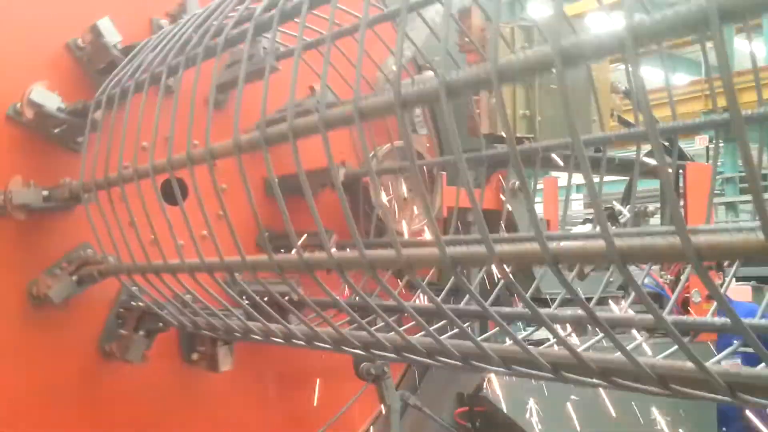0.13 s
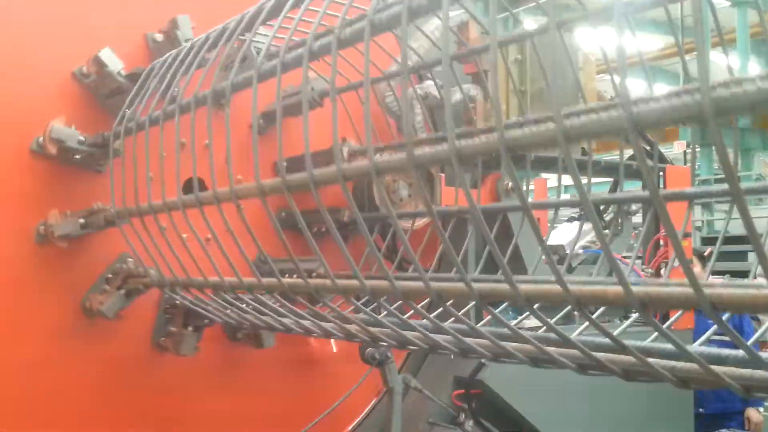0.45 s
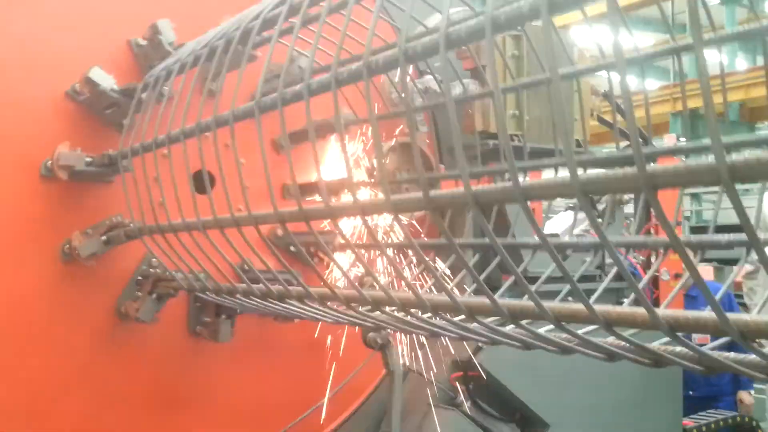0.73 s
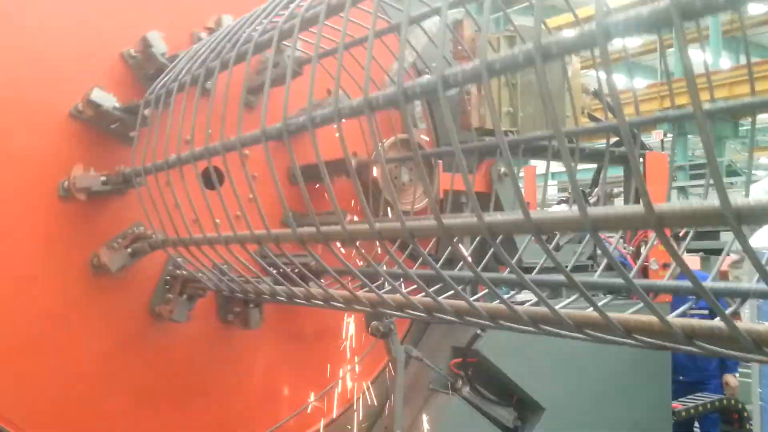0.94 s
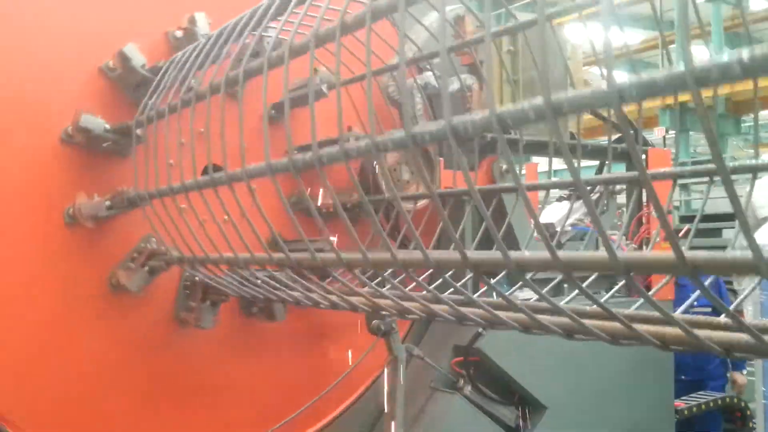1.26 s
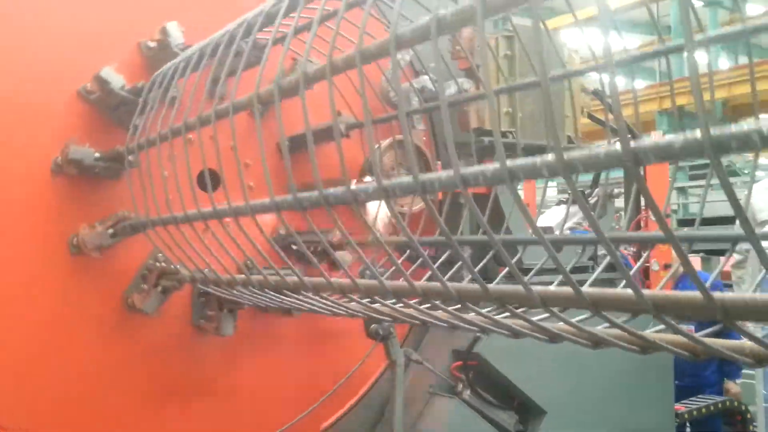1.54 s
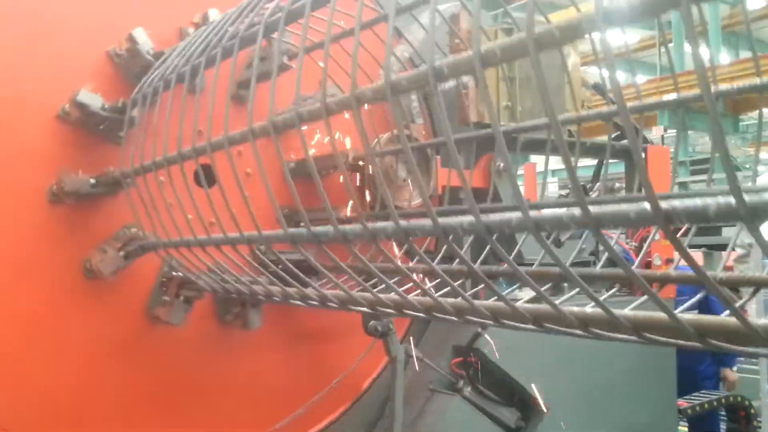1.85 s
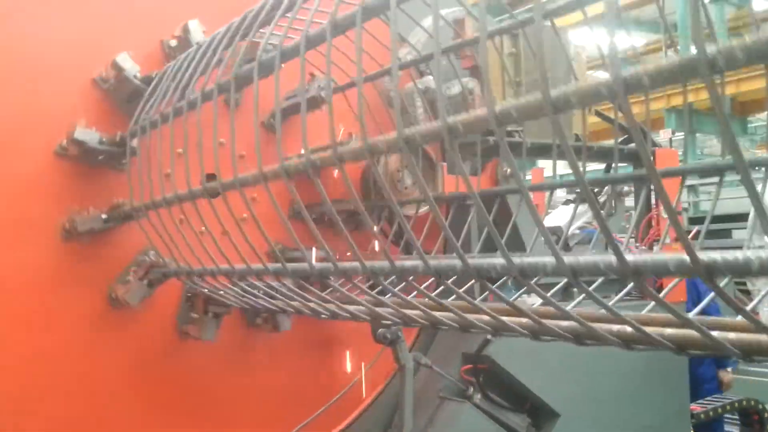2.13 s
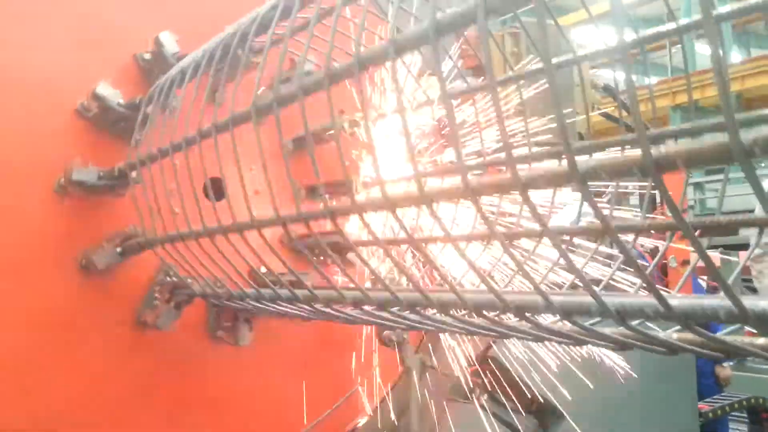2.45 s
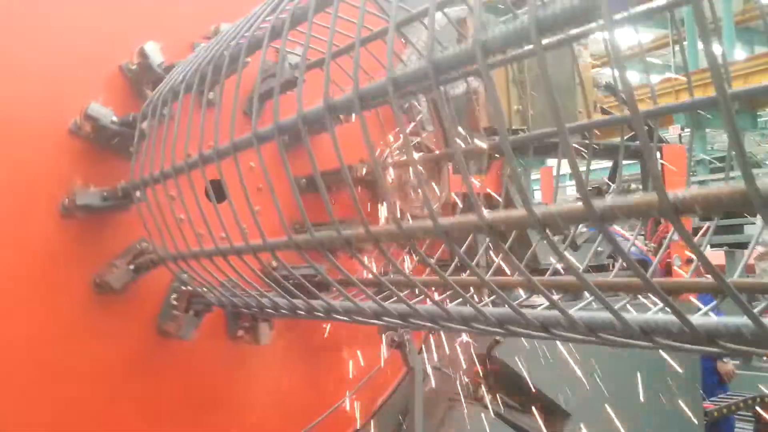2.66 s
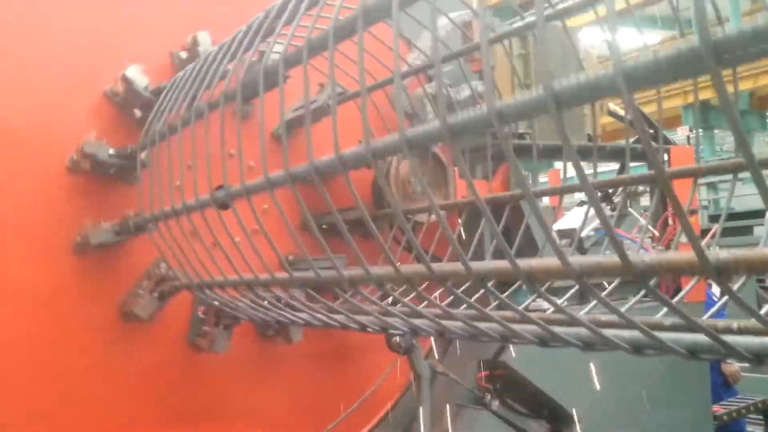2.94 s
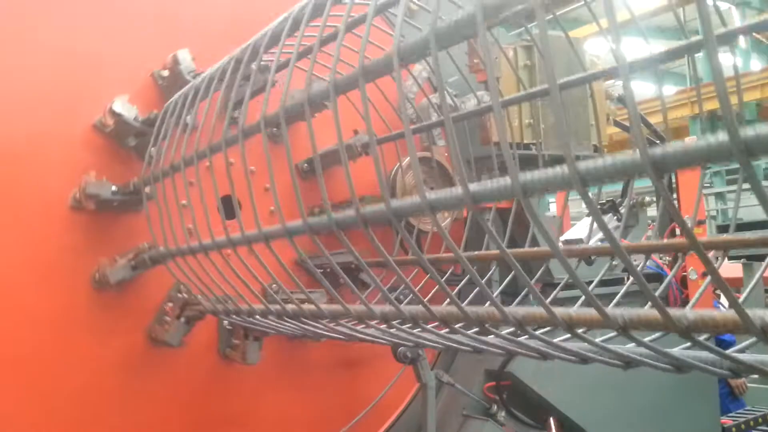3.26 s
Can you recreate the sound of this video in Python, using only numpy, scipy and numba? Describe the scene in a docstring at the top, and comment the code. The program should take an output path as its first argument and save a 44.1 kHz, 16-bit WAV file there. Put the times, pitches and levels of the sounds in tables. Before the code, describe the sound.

Welding machine fires irregular, bright sputtering bursts that ring a steel bar cage and wash through a large factory hall, over constant motor and fan roar, wavering hum and occasional dull knocks; loud, clipped stereo camera sound.

```python
"""Bright weld sputter bursts ring a steel cage and fill a factory hall, over a roar and wavering hum.
Sputter: clicks and hiss under burst envelopes, through cage resonances and diffuse hall tails.
Dull knocks of the drive are decaying noise bands; motor lines are steady tones plus narrow noise.
Motors and fans roar as random short-time spectra with drifting patches.
A camera with two spaced microphones evens the level by gain control and clips the peaks."""
import sys
import numpy as np
from scipy import signal
from scipy.fft import rfft, irfft, next_fast_len
from scipy.io import wavfile
from scipy.ndimage import uniform_filter1d
from numba import njit

SR = 44100
rng = np.random.default_rng(int(sys.argv[2]) if len(sys.argv) > 2 else 0)


def elevation(decibels):
    """Turn decibel levels (scalar or array-like) into linear amplitude ratios."""
    levels = np.asarray(decibels, float)
    return 10 ** (levels / 20)


def wrap_up_sound(samples):
    """Save the sound to the file named by the first command line argument, as 16-bit audio."""
    columns = np.atleast_2d(samples).T
    # keep every value between -1 and 1, then stretch to whole-number steps
    tamed = np.clip(columns, -1, 1)
    steps = np.round(tamed * 32767).astype(np.int16)
    wavfile.write(sys.argv[1], SR, steps)


N = 149499

# weld bursts: start_s, relative treble_db, mid_minus_treble_db, relative top_minus_treble_db, length_s
BURSTS = [(-.03, -4.5, 6.5, 0, 0.023), (.01, -8, -5.5, 2, 0.029), (0.036, -12.5, -4, 6, 0.029),
          (0.085, -11.5, 0, 0, 0.038), (0.146, -15, 3.5, 2, 0.035), (0.19, -7, -1, -7, 0.043),
          (0.29, -9.5, -1.5, -3.5, .033), (0.347, -10.5, -2.5, -1, 0.048), (0.479, -11, 0, -7, 0.042),
          (0.591, -13, 0.5, 1, 0.036), (0.637, -14, 1.5, 1, 0.03), (0.695, -11, -1.5, -3, 0.026),
          (0.73, -6.5, -2, -2, 0.013), (0.968, -14.5, -1, -1, 0.052), (1.049, -16, 3.5, -4, 0.034),
          (1.121, -8.5, 0.5, -4.5, 0.033), (1.417, -12, 3.5, 1, 0.012), (1.433, -23, 12.5, -8, 0.03),
          (1.51, -28, -5, 11, 0.014), (1.555, -8, 0.5, -1, .022), (1.571, -7, -5, -5, 0.021),
          (1.677, -21, 1, 0, 0.0086), (1.865, -16.5, -8, 5.5, .03), (1.906, -8.5, -1.5, -1, 0.022),
          (1.957, -13, -14, 3, 0.056), (2.017, -5, -3, 0.5, 0.034), (2.203, -11, 0, -2.5, 0.015),
          (2.235, -22.5, 8, 4, 0.057), (2.33, -17, 3, -3, 0.012), (2.426, -4, -2.5, -2.5, 0.033),
          (2.51, -13, 0, -3, 0.0083), (2.59, -25, 1, 13, 0.014), (2.728, -20, 11.5, -13, 0.024),
          (2.869, -5.5, -1, -11, 0.029), (2.927, -7.5, -7, -4, 0.036), (2.964, -8.5, -4, -3.5, .03),
          (3.046, -9.5, 0, 2.5, 0.026), (3.279, -14, 1.5, 7, 0.033), (3.299, -7, 0.5, -34, 0.026),
          (3.349, -6.5, -1.5, 2.5, 0.045)]
# sputter treble spectrum: freq_hz, relative level_db per Hz
TREBLE_SPECTRUM = [(2060, -33), (3500, 0.5), (4200, 3), (4690, 2.5), (5070, -3), (5600, -1), (5900, -5),
                   (6600, -4), (7510, -5.5), (9000, -11.5), (11000, -18), (14000, -53)]
# sputter mid spectrum: freq_hz, relative level_db per Hz
MID_SPECTRUM = [(410, -24.5), (700, -10), (912, -8.5), (1600, 5), (2400, -1.5), (3050, 0), (3400, -9),
                (4500, -18), (5850, -83), (9900, -120)]
# sputter top spectrum: freq_hz, relative level_db per Hz
TOP_SPECTRUM = [(6000, -30), (8000, -9.5), (9200, 3), (9900, -4), (11000, 1.5), (12500, -1.5), (13500, -4),
                (14600, -7.5)]
# cage modes: freq_hz
CAGE_MODE_HZ = [2115, 2347, 2660, 2790, 5030, 5095, 5190, 5336, 7010, 9900]
# the same cage modes: width_hz, peak_db over the unresonant path
CAGE_MODES = [(44.6, -3.5), (35, 6), (45, -5), (59.7, 0.5), (25, 10), (40, -2), (60, -6), (20, -2.5),
              (100, -1), (150, 1)]
# weld balance: freq_hz, left_minus_right_db
WELD_BALANCE = [(900, -1.5), (1250, 1), (2280, 3), (4190, 0), (5200, -4.5), (7690, 0.5), (14100, 6.5)]
# hall decay: freq_hz, t60_s
HALL_DECAY = [(500, 0.5), (2000, 1.52), (5000, 0.73), (9000, 0.83), (14000, 0.88)]
# drive knocks: start_s, level_db, pitch_hz, left_minus_right_db
KNOCKS = [(0.561, -13, 1340, 7), (0.924, -13, 675, -5), (1.099, -10, 644, -5), (1.542, -10.5, 580, -6),
          (2.285, -8.5, 980, 1), (3.235, -9, 546, -1), (3.266, -18, 620, 9)]
# motor lines: freq_hz
HUM_HZ = [300, 323, 384, 456, 575, 601, 684, 1162, 1296]
# the same motor lines: relative level_db
HUM_DB = [-28.5, -26, -35, -36.5, -29, -27.5, -20.5, -33, -32.5]
# load swell of hum (in full) and low roar (in part): time_s, level_db
LOAD_SWELL = [(0, 2), (.4, -1.5), (.8, 1), (1.2, -1), (1.5, 4), (1.85, 5.5), (2.1, -6.5), (2.3, 6.5),
              (2.48, 1), (2.6, 8), (2.85, 3), (2.95, -4), (3.15, -1.5), (3.25, 5), (3.39, -3)]
# roar spectrum: freq_hz, relative level_db per Hz
ROAR_SPECTRUM = [(24, -79), (40, 1), (209, -14.5), (295, -7.5), (407, -3.5), (683, -2), (832, -4.5),
                 (1470, -2.5), (1740, -11), (2290, -2.5), (3310, -8.5), (4450, -9.5), (7660, -24),
                 (13200, -50), (14600, -53)]
# roar stereo likeness: freq_hz, left_right_correlation
ROAR_LIKENESS = [(60, 0.9), (290, 0.81), (620, 0.66), (900, 0.45), (1400, 0.63), (3000, 0.25), (5000, 1),
                 (14000, .1)]
# roar stereo phase: freq_hz, left_lead_rad
ROAR_LEFT_LEAD = [(0, 0), (780, 0.0), (1460, -1.5), (1720, -6.5), (2410, -3.5), (3010, -7.5), (3960, -10.0),
                  (5000, -11.5), (6370, -23), (6980, -9.5), (8790, -24), (11400, -31), (11900, -13),
                  (14300, -41)]

RISE_S, FALL_S, SPUTTER_DB, TOP_DB = 0.0013, 0.018, -1.5, -8
CRACKLES_PER_S, CRACKLE_SHARE = 3000, 0.35
LEFT_LATE_SAMPLES, DIRECT_DB, HALL_DB = 17, 0.5, 1
KNOCK_T60_S, KNOCK_RELATIVE_WIDTH = 0.45, 0.72
HUM_POLE_WIDTH_HZ, HUM_STEADY = 9, 1.1
ROAR_DB, LOAD_TOP_HZ = -6.5, 1200
LOW_CUT_HZ, RUMBLE_DB, RUMBLE_TOP_HZ = 199, -61.5, 110
HOLD_DB, GAIN_DB_PER_DB, ATTACK_S, RELEASE_S, CLIP_LEVEL = -12.5, 0.71, 0.05, 0.18, 0.97


def evened(x):
    """Scales to rms 1."""
    return x / np.sqrt(np.mean(x ** 2) + 1e-20)


def read(points, hz):
    """Interpolates a table on a log-frequency axis."""
    f, value = np.transpose(points)
    return np.interp(np.log(hz + 1), np.log(f + 1), value, left=value[0], right=value[-1])


def colour(x, gain):
    """Filters by a gain given as a function of Hz."""
    size = next_fast_len(N + 4096)
    spectrum = rfft(x, size) * gain(np.fft.rfftfreq(size, 1 / SR))
    return irfft(spectrum, size)[..., :N]


def cage_response(hz):
    """Direct path plus one complex resonance per cage mode."""
    response = 1
    for mode_hz, (width_hz, db) in zip(CAGE_MODE_HZ, CAGE_MODES):
        response = response + elevation(db) / (1 + 2j * (hz - mode_hz) / width_hz)
    return response


def sputter():
    """Dense arc crackle and hiss in three bands under burst envelopes, ringing the cage bars."""
    t, power = np.arange(N) / SR, np.zeros((3, N))
    for start_s, db, mid_db, top_db, length_s in BURSTS:
        u = t - start_s
        shape = np.clip(u / RISE_S, 0, 1) * np.exp(-np.maximum(u - length_s, 0) / FALL_S)
        band_db = db + SPUTTER_DB + np.array([[0], [mid_db], [top_db + TOP_DB]])
        power += (shape * elevation(band_db)) ** 2
    clicks = (rng.random(N) < CRACKLES_PER_S / SR) * rng.choice([-1., 1.], N)
    hiss = rng.standard_normal(N)
    drive = CRACKLE_SHARE * evened(clicks) + (1 - CRACKLE_SHARE) * hiss
    out = np.zeros(N)
    for envelope, table in zip(np.sqrt(power), (TREBLE_SPECTRUM, MID_SPECTRUM, TOP_SPECTRUM)):
        gain = lambda hz: elevation(read(table, hz)) * cage_response(hz)
        out += colour(envelope * drive, gain) / np.std(colour(drive, gain))
    return out


def hall(x):
    """Three diffuse tails per microphone, cross-faded in turn for a smooth wash; decay varies with frequency."""
    out = np.zeros((2, N))
    fade_rad = np.arange(N) / SR * np.pi * 7.3
    for k in range(3):
        hz, t, z = signal.stft(rng.standard_normal((2, SR)), SR, nperseg=256)
        decay = elevation(-60 * t / read(HALL_DECAY, hz)[:, None])
        tail = signal.istft(z * decay, SR, nperseg=256)[1]
        tail = tail * np.clip(np.arange(tail.shape[1]) / SR / 0.006, 0, 1)  # 6 ms onset
        fed = x * np.sqrt(2 / 3) * np.cos(fade_rad + k * np.pi / 3)  # the three powers sum to that of x
        out += signal.fftconvolve(fed[None], tail / np.linalg.norm(tail[0]), axes=1)[:, :N]
    return out


def weld():
    """Direct sputter, late at the left microphone, plus hall, with a left-right balance over frequency."""
    source = sputter()
    direct = np.array([np.roll(source, LEFT_LATE_SAMPLES), source])
    both = elevation(DIRECT_DB) * direct + elevation(HALL_DB) * hall(source)
    left = colour(both[0], lambda hz: elevation(read(WELD_BALANCE, hz) / 2))
    right = colour(both[1], lambda hz: elevation(-read(WELD_BALANCE, hz) / 2))
    return np.array([left, right])


def knocks():
    """Short dull blows: band noise around one pitch each, decaying exponentially."""
    t, out = np.arange(N) / SR, np.zeros((2, N))
    spread = 1 + KNOCK_RELATIVE_WIDTH / 2
    for start_s, db, hz, pan_db in KNOCKS:
        band = signal.butter(2, [hz / spread, hz * spread], "band", fs=SR, output="sos")
        noise = evened(signal.sosfilt(band, rng.standard_normal(N)))
        u = np.maximum(t - start_s, 0)
        blow = noise * np.minimum(u / 0.008, 1) * elevation(db - 60 * u / KNOCK_T60_S)  # 8 ms rise
        out += blow * elevation(np.array([[pan_db / 2], [-pan_db / 2]]))
    return out


def hum():
    """Motor lines: a steady part plus narrow noise, shared and per side, that makes them waver."""
    t, out = np.arange(N) / SR, np.zeros((2, N))
    r = np.exp(-np.pi * HUM_POLE_WIDTH_HZ / SR)
    for hz, db in zip(HUM_HZ, HUM_DB):
        noise = rng.standard_normal((3, N)) + 1j * rng.standard_normal((3, N))
        wobble = signal.lfilter([1], [1, -2 * r, r * r], noise)
        wobble /= np.sqrt(np.mean(abs(wobble) ** 2))
        phasor = HUM_STEADY + 0.5 * wobble[0] + 0.32 * wobble[1:]
        out += elevation(db) * (phasor * np.exp(2j * np.pi * hz * t)).real
    return out * elevation(np.interp(t, *np.transpose(LOAD_SWELL)))


def roar():
    """Motors and fans: random short-time spectra with drifting patches and a swell in the lows."""
    frames, hz = N // 256 + 5, np.fft.rfftfreq(1024, 1 / SR)
    a, b, c, d, patches = rng.standard_normal((frames, 513, 5)).T
    patches = uniform_filter1d(patches, size=10, axis=0)  # over frequency
    patches = evened(uniform_filter1d(patches, size=12, axis=1))  # over time
    same = np.clip(read(ROAR_LIKENESS, hz), -1, 1)[:, None]
    left = a + 1j * b
    right = same * left + np.sqrt(1 - same ** 2) * (c + 1j * d)
    z = np.array([left, right])
    z[0] *= np.exp(1j * np.interp(hz, *np.transpose(ROAR_LEFT_LEAD)))[:, None]
    load_db = np.interp(np.arange(frames) * 256 / SR, *np.transpose(LOAD_SWELL))
    load_db = load_db / (1 + (hz[:, None] / LOAD_TOP_HZ) ** 2)
    z *= elevation(read(ROAR_SPECTRUM, hz)[:, None] + 0.79 * patches + 0.38 * load_db)
    return elevation(ROAR_DB) * evened(signal.istft(z, nperseg=1024, noverlap=768)[1][:, :N])


def scene():
    """Sums weld, knocks, hum and roar at the two microphones."""
    return weld() + knocks() + hum() + roar()


def rumble():
    """Faint uneven low floor of the microphone circuit, partly shared by both sides."""
    uneven = elevation(7 * evened(uniform_filter1d(rng.standard_normal(N), size=3000)))
    noise = rng.standard_normal(N) + 0.55 * rng.standard_normal((2, N))
    low_pass = signal.butter(2, RUMBLE_TOP_HZ, fs=SR, output="sos")
    return elevation(RUMBLE_DB) * uneven * evened(signal.sosfilt(low_pass, noise))


@njit
def follow(x, up, down):
    """One-pole smoothing with separate upward and downward rates."""
    y, out = x[:2000].mean(), np.empty_like(x)
    for i in range(len(x)):
        y += (x[i] - y) * (up if x[i] > y else down)
        out[i] = y
    return out


def gain_control(x):
    """Pulls the followed level of both sides part of the way to HOLD_DB."""
    power_db = 10 * np.log10(abs(uniform_filter1d((x ** 2).mean(0), size=300)) + 1e-9)
    level_db = follow(power_db, 1 / (ATTACK_S * SR), 1 / (RELEASE_S * SR))
    return x * elevation(-GAIN_DB_PER_DB * (level_db - HOLD_DB))


def band_limit(x):
    """A steep low-pass at the top of the band."""
    return signal.sosfilt(signal.butter(12, 14700, fs=SR, output="sos"), x)


def record(dry):
    """Camera: low cut, circuit floor, gain control and hard clipping."""
    low_cut = signal.butter(8, LOW_CUT_HZ, "high", fs=SR, output="sos")
    picked_up = signal.sosfilt(low_cut, dry) + rumble()
    clipped = np.clip(gain_control(picked_up), -CLIP_LEVEL, CLIP_LEVEL)
    return band_limit(clipped)


dry = scene()
out = record(dry)
wrap_up_sound(out)
```